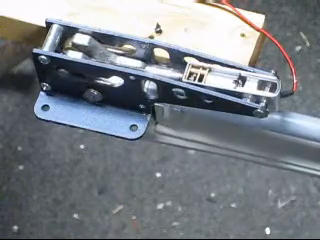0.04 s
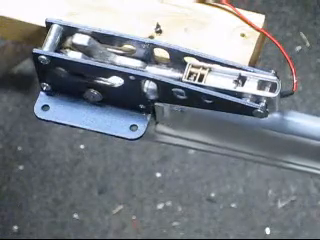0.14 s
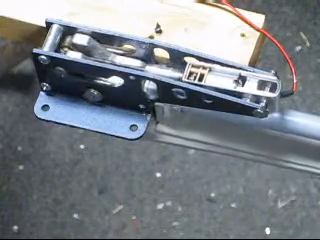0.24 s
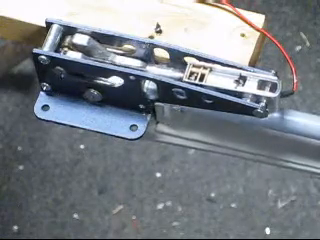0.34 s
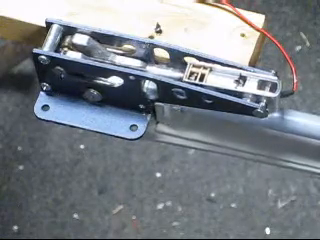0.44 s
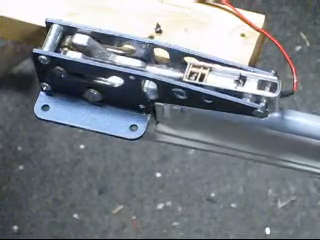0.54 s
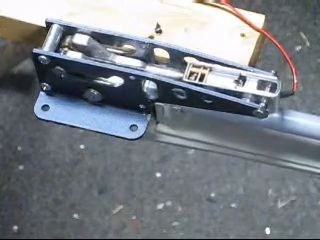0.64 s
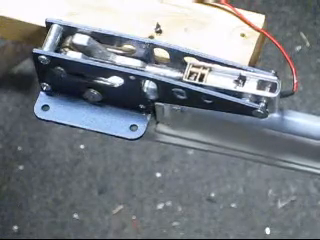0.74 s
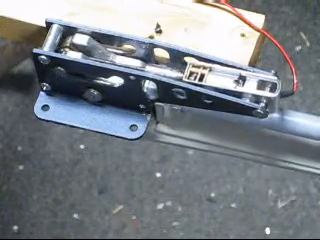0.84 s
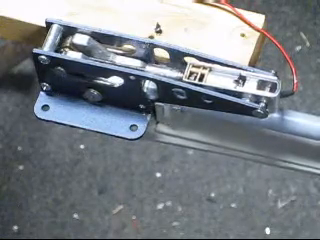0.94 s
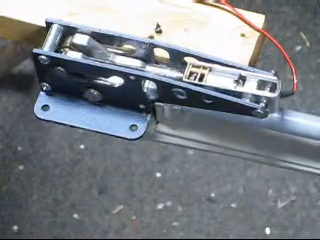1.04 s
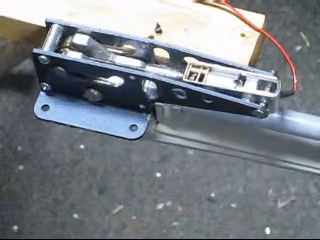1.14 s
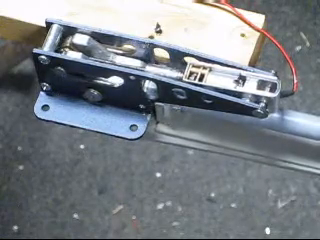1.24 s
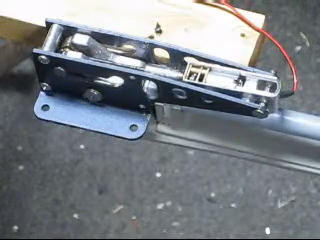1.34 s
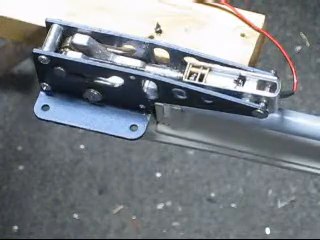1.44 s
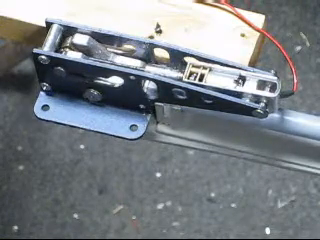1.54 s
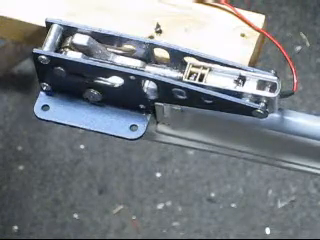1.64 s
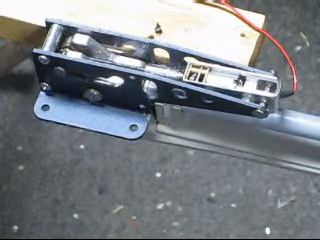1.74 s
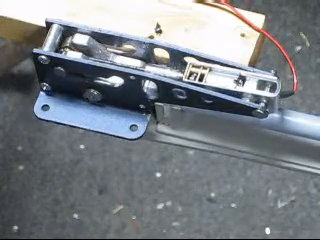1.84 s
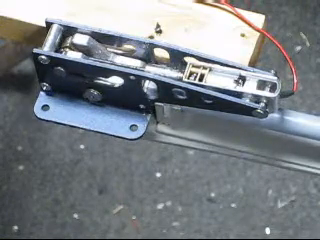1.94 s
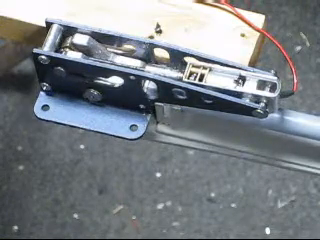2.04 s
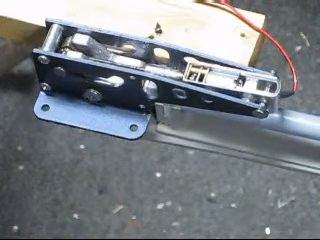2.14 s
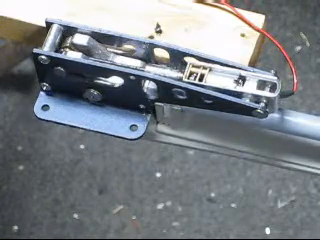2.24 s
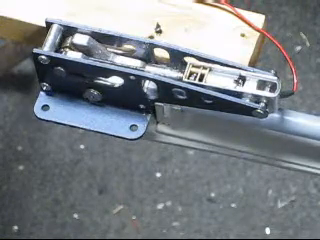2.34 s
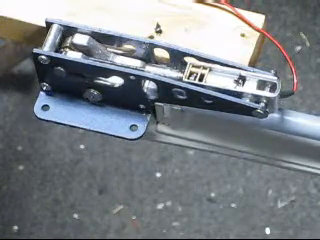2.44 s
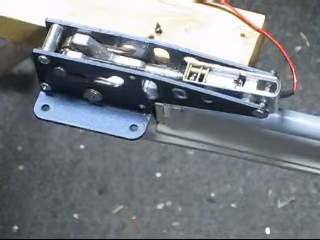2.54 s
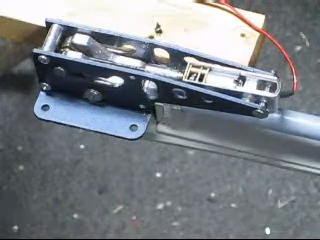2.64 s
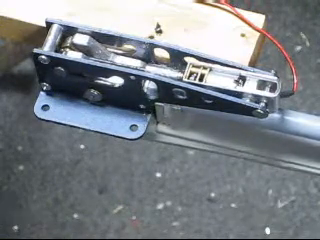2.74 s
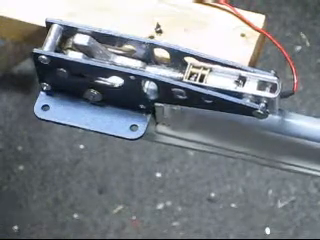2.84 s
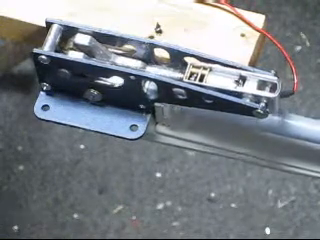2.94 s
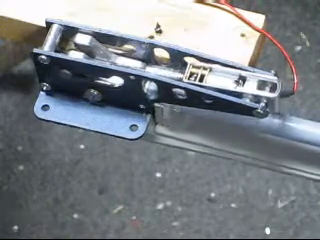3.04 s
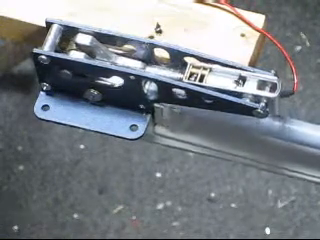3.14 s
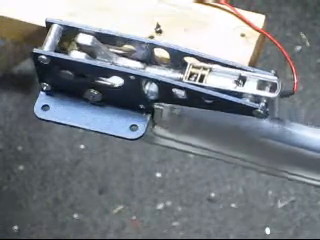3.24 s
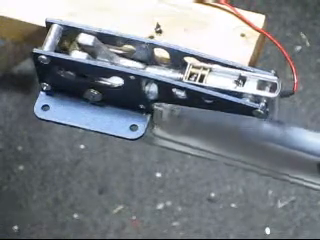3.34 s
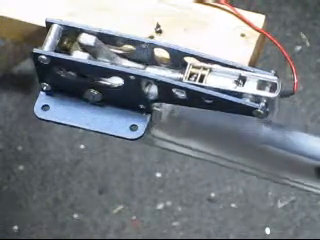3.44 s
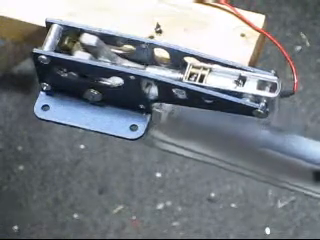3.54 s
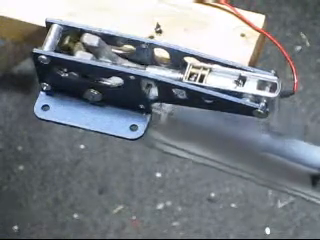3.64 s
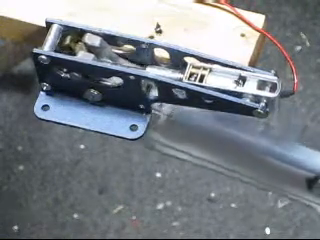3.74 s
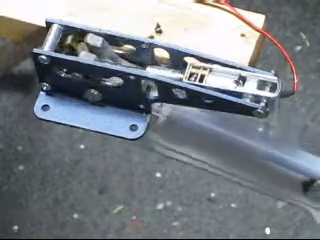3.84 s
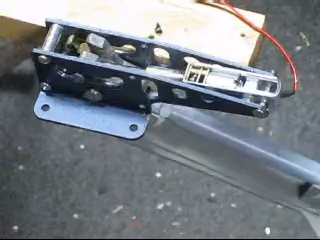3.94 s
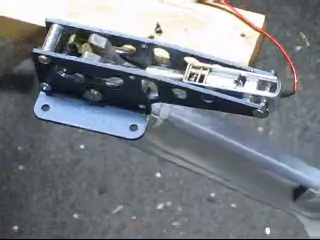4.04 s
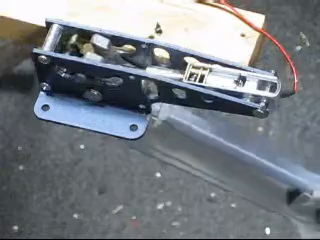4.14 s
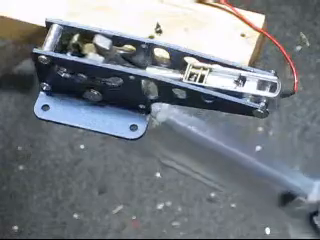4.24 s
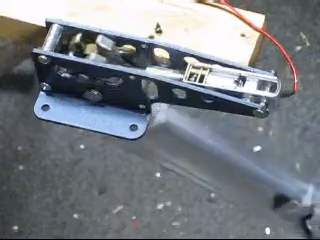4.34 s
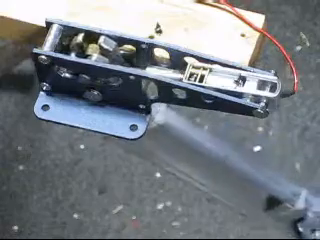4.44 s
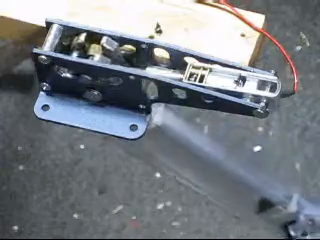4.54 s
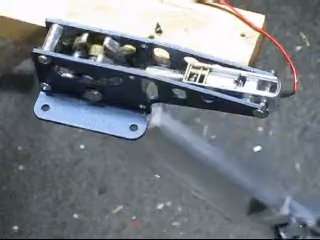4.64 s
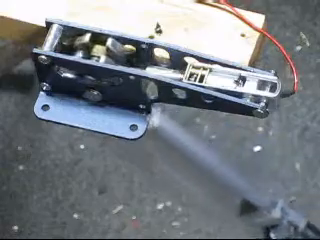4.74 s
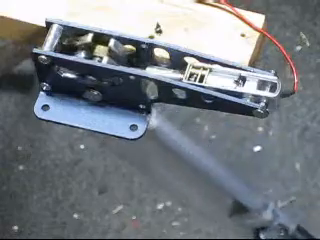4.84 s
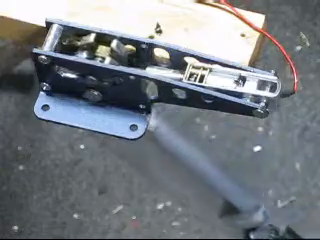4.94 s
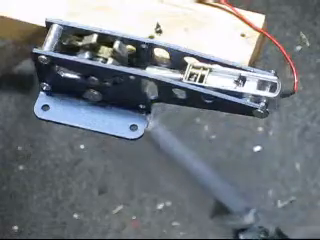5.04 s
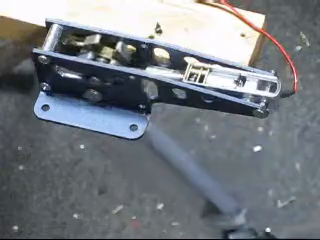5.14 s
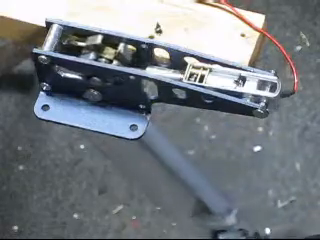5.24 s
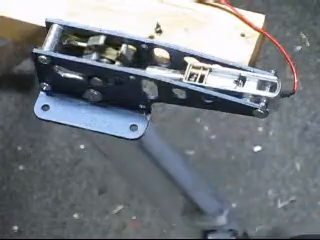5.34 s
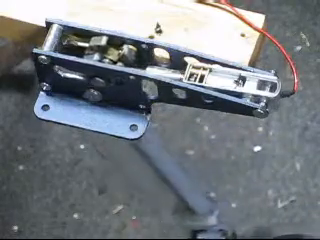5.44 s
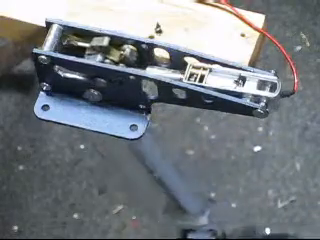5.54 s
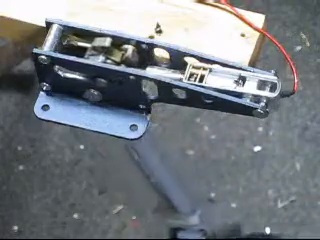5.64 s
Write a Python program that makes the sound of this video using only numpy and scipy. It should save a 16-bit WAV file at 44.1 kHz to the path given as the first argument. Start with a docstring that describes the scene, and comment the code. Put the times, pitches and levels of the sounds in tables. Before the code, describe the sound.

Harsh, buzzy motor whine with gritty gear rattle, two knocks at the stop, a quiet pause, a bright clack and a second running stretch.

```python
"""Geared screw actuator in a quiet workshop

A geared screw actuator in a steel frame runs one way, twitches, rests, then clacks and runs back.
Two small rotors sing at multiples of their shaft speed; off-centre gears make the mesh whine throb.
Filtered noise and random taps are the teeth and screw rattling in the ringing frame.
Short tones glide, damped tones knock, and steady noise and mains hum fill the background."""
import sys
import numpy as np
from scipy import signal
from scipy.fft import rfft, irfft, next_fast_len
from scipy.io import wavfile

SR = 44100
rng = np.random.default_rng(int(sys.argv[2]) if len(sys.argv) > 2 else 0)


def dump_mix(stems):
    """Bounce the given channels to the path in sys.argv[1] as a 16-bit WAV at rate SR."""
    frames = np.atleast_2d(stems).T  # one column per channel
    limited = np.clip(frames, -1, 1)  # hard clip at full scale
    pcm = np.round(limited * 32767).astype(np.int16)
    wavfile.write(sys.argv[1], SR, pcm)


N = 250437
T = np.arange(N) / SR  # time of each sample, s
FREQS = np.fft.rfftfreq(N, 1 / SR)  # Hz

# main rotor in each stroke, before throb and flutter: time_s, shaft_speed_hz, mesh_whine_db, other_tones_db
MAIN_OUT = [(0, 98.5, -19.5, -2.5), (.15, 99.96, -21.5, 0.5), (.3, 101.2, -21.5, 2.5), (.42, 99.2, -21, -3),
            (.5, 94.84, -17.5, -9), (.58, 94.54, -16, -4), (.72, 100.7, -21.5, 1), (.8, 101.3, -20, 1),
            (.95, 102.9, -28.5, 3), (1.15, 103.9, -24.5, 3), (1.3, 105.2, -31, 1.5), (1.44, 105, -30, 4.5)]
MAIN_BACK = [(2.9, 113.2, -44, -5.5), (3, 117.1, -35, -0.5), (3.13, 116.6, -28.5, -3),
             (3.18, 115.4, -23.5, 1), (3.5, 114, -26.5, -1), (3.8, 113.1, -23.5, 1),
             (4.08, 111.1, -28.5, -8), (4.5, 109.8, -22.5, 1.5), (4.9, 109.5, -23.5, 3.5),
             (5.3, 110.2, -24.5, 4), (5.45, 111.4, -28, -2), (5.68, 109.3, -31, 0)]
# second rotor on the way back: time_s, shaft_speed_hz, mesh_whine_db, other_tones_db
SECOND_BACK = [(3.86, 109.4, -35, 0), (4.2, 108.6, -38, 5.5), (4.55, 107.8, -43, 5),
               (4.9, 107.1, -35, -0.5), (5.68, 107.4, -45, 4)]
# second rotor on the way out: it stalls once under load, then twitches twice at the end stop
# on_s, off_s, driven_whine_db, braking_whine_db, other_tones_db (levels at top speed)
SECOND_RUNS = [(-.2, .414, -31, -24, 0), (.595, 1.434, -36, -14, -6.5), (1.548, 1.594, -14.5, -34, -22),
               (1.673, 1.715, -33, -38, -28)]
# tones besides the mesh whine: multiple_of_shaft_speed, level_db (other_tones_db is added)
MAIN_OUT_TONES = [(5, -61), (10, -50), (11.14, -45), (13, -45), (15, -44.5), (20, -45), (26, -39.5),
                  (32, -43), (74, -47.5), (100, -48.5), (111, -49)]
MAIN_BACK_TONES = [(5, -47.5), (11.14, -47.5), (15, -49), (18.57, -44), (22.28, -53), (26, -41), (45, -46),
                   (55, -47), (74, -48), (100, -50)]
SECOND_OUT_TONES = [(5, -49), (11.14, -48), (13, -42), (74, -50.5), (100, -45), (111, -62)]
SECOND_BACK_TONES = [(11.14, -49.5), (13, -42.5), (15, -42), (25, -37.5), (27, -45), (30, -48), (31, -53),
                     (74, -61), (111, -52)]
# gear tones that sing while the load is light: time_s, level_db
LIGHT_WHINE = [(2.92, -35.5), (3.2, -31.5), (3.82, -30.5)]
# their mix: multiple_of_shaft_speed, relative_level_db
LIGHT_TONES = [(11.14, -9.5), (15, -7.5), (26, 3), (74, -14), (100, -23)]
# depth of the throb from the off-centre gears: time_s, whine_swing_db, rattle_swing_db
THROB_OUT = [(.1, 4.5, 0.1), (.55, 4.5, 0.1), (.9, -1, 2)]
THROB_BACK = [(3.5, 1.4, .4), (4.05, 3.8, .4), (5, 3.5, 1.5)]
# rattle of teeth and screw, before band trims and throb: time_s, body_db, clatter_db, hiss_db
RATTLE_OUT = [(0, -35, -29.5, -25), (.43, -34, -28, -25), (.52, -39.5, -34.5, -30), (.7, -30.5, -28, -26),
              (1, -38, -25.5, -28), (1.455, -34, -26.5, -27)]
RATTLE_BACK = [(2.87, -40.5, -44, -38), (3.1, -35.5, -34, -32.5), (3.3, -36, -30.5, -29.5),
               (4, -31, -31, -28.5), (4.8, -31.5, -27.5, -27), (5.68, -31, -26.5, -29)]
# colour of the rattle in each direction: pitch_hz, relative_level_db
COLOUR_OUT = [(200, -30), (600, -30), (850, -17.5), (1100, -12.5), (1800, -4.5), (2350, -8), (2700, -3),
              (3300, 4), (4100, -3.5), (4600, 0), (5300, -8.5), (6000, -17), (8500, -21), (12000, -25.5)]
COLOUR_BACK = [(200, -36.5), (500, -25), (850, -13.5), (1200, -11), (1800, -7), (2350, -3), (2750, 4),
               (3400, 4), (3900, -1.5), (4400, 5), (5300, -4), (6800, -11.5), (9000, -13), (12000, -18.5)]
# resonances of the steel frame: pitch_hz, width_hz, lift_db
FRAME = [(1143, 88, 7.5), (1410, 100, 2.5), (2260, 510, 1), (2696, 88, 4.5), (3198, 49, 7), (3310, 72, 0.5),
         (3520, 120, 6), (4710, 330, -8)]
# the loose gear train shakes at each jerk: peak_s, rise_s, body_db, hiss_db
SHAKES = [(1.551, 0.016, -28, -26.5), (1.587, 0.08, -30.5, -29), (1.636, .07, -31.5, -37.5),
          (1.679, .008, -30, -37), (1.73, 0.096, -32, -34.5), (1.768, 0.1, -31.5, -33.5),
          (2.794, 0.0054, -27.5, -28), (2.835, 0.038, -27.5, -27.5), (2.912, .03, -34, -35)]
# gear whine of the second rotor as it speeds up or brakes:
# start_s, length_s, start_pitch_hz, end_pitch_hz, level_db
WHINE_GLIDES = [(0.616, 0.039, 853, 1277, -31), (.683, 0.015, 1167, 850, -35),
                (0.734, 0.029, 779, 1320, -27.5), (1.629, 0.02, 1280, 930, -28.5),
                (1.757, 0.0174, 1650, 1164, -24)]
# knocks at starts and stops, and one faint dull tick during the rest:
# start_s, level_db, brightness_db_per_octave
KNOCKS = [(1.548, -15.5, -2.5), (1.673, -16.5, -0.5), (1.764, -29, -3), (2.292, -40.5, -12.5),
          (2.791, -11, 10.5), (2.7922, -9, 6), (2.7951, -19.5, -6.5)]
# what a knock rings: pitch_hz, relative_level_db, time_to_fade_60_db_s
KNOCK_MODES = [(710, -29.5, 0.021), (1177, -12.5, 0.032), (1500, -7, 0.031), (1926, -3.5, 0.0077),
               (2600, -4, 0.021), (3280, -8, 0.01), (4660, -12, 0.0089), (6300, -7, .007),
               (7500, -13, 0.013), (10300, -21, 0.0036)]
# colour of the room air: pitch_hz, relative_level_db
AIR_COLOUR = [(25, -20), (80, -14), (250, -10.5), (400, -10), (800, -10.5), (1400, -8.5), (3000, -15.5),
              (7000, -22.5), (12500, -28.5)]
# mains hum: pitch_hz, level_db
HUM = [(60, -79), (120, -61), (180, -64.5), (240, -55.5), (360, -63)]

MESH_ORDER = 37  # mesh whine cycles per shaft turn
WHEEL_RATIO, IDLER_RATIO = 10.2, 4.8  # shaft turns per gear turn
TOP_SPEED_HZ, SPIN_UP_S, BRAKE_HZ_PER_S = 104.4, 0.025, 1150  # second rotor on the way out
SPEED_LAW_DB = 15  # louder by this much for each doubling of speed
START_DB_PER_S, STOP_DB_PER_S = 900, 397  # how fast the gear noise builds and dies away


def amp(db):
    """Turns decibels into gain."""
    return 10 ** (np.asarray(db) / 20)


def unit(x):
    """Scales a signal to an rms of 1."""
    return x / np.sqrt(np.mean(x ** 2) + 1e-20)


def follow(rows):
    """Reads each column of a timed table as a smooth curve over every sample."""
    s, *columns = np.transpose(rows)
    return [np.interp(T, s, column) for column in columns]


def colour(points):
    """Gain at every frequency, drawn through pitch and level points."""
    hz, db = np.transpose(points)
    return amp(np.interp(np.log(FREQS + 1), np.log(hz), db))


def drift(rate_hz):
    """Random wandering of rms 1, made of noise that falls away above rate_hz."""
    size = next_fast_len(N, True)
    smoothing = 1 + (np.fft.rfftfreq(size, 1 / SR) / rate_hz) ** 4
    wander = irfft(rfft(rng.standard_normal(size)) / smoothing, size)
    return unit(wander[:N])


def background():
    """Steady room air is coloured noise; mains hum is a few fixed tones."""
    noise = irfft(rfft(rng.standard_normal(N)) * colour(AIR_COLOUR), N)
    out = amp(-46) * unit(noise)
    for hz, db in HUM:
        out += np.sqrt(2) * amp(db) * np.sin(2 * np.pi * (hz * T + rng.random()))
    return out


def workshop(x, wet_db=-17, t60_s=0.1):
    """The bench and walls return a short tail of scattered, dulled echoes."""
    t = np.arange(SR // 2) / SR
    echoes = rng.standard_normal(len(t)) * (rng.random(len(t)) < 2000 / SR)  # about 2000 a second
    echoes *= (t > 0.002) * amp(-60 * t / t60_s)
    tail = signal.lfilter(*signal.butter(1, 4000, fs=SR), echoes)
    return x + amp(wet_db) * signal.fftconvolve(x, tail / np.linalg.norm(tail))[:N]


def knocks(crack_db=-7, crack_s=0.0016):
    """Each knock is a short noise crack plus the damped ringing of the gearbox."""
    t = np.arange(4096) / SR
    out = np.zeros(N)
    for s, db, bright in KNOCKS:
        crack = amp(crack_db) * rng.standard_normal(len(t)) * np.exp(-t / crack_s)
        ring = np.zeros(len(t))
        for hz, mode_db, t60_s in KNOCK_MODES:
            level_db = mode_db + bright * np.log2(hz / 3000) - 60 * t / t60_s
            ring += amp(level_db) * np.sin(2 * np.pi * (hz * t + rng.random()))
        out[round(s * SR):][:len(t)] += amp(db) * (ring + crack)
    # small parts radiate no bass
    return signal.sosfilt(signal.butter(2, 350, "high", fs=SR, output="sos"), out)


def whine_glides(rough=0.4):
    """Short rough glides of the second rotor's gear whine as it speeds up or brakes."""
    out = np.zeros(N)
    for s, length, from_hz, to_hz, db in WHINE_GLIDES:
        progress = np.clip((T - s) / length, 0, 1)
        pitch_hz = from_hz + (to_hz - from_hz) * progress
        voice = np.sin(2 * np.pi * np.cumsum(pitch_hz) / SR)
        out += amp(db) * np.sin(np.pi * progress) * voice * (1 + rough * drift(160))
    return out


def rattle(levels, spectrum, turns, swing_db, band_db, pulsing, taps_per_s, tap_spread_db, tap_db,
           flicker_db, swing_share):
    """Sliding teeth hiss and loose teeth tap, pulsing with the shaft, into the frame's resonances."""
    tap_sizes = amp(tap_spread_db * np.minimum(rng.exponential(1, N), 3))
    taps = (rng.random(N) < taps_per_s / SR) * rng.choice([-1, 1], N) * tap_sizes
    drive = rng.standard_normal(N) + amp(tap_db) * unit(taps)
    drive *= 1 + pulsing * np.cos(4 * np.pi * turns)  # twice a turn
    drive *= amp(flicker_db * drift(38))
    frame = np.prod([1 + (amp(db) - 1) / (1 + 2j * (FREQS - hz) / width) for hz, width, db in FRAME], axis=0)
    rung = rfft(drive) * colour(spectrum) * frame
    # split into body, clatter and hiss
    below_clatter = 1 / (1 + (FREQS / 2300) ** 16)
    below_hiss = 1 / (1 + (FREQS / 4400) ** 16)
    bands = below_clatter, below_hiss - below_clatter, 1 - below_hiss
    out = np.zeros(N)
    # the rattle throbs with the wheel, each band by its own share
    for band, level, trim_db, share in zip(bands, levels, band_db, swing_share):
        out += unit(irfft(rung * band, N)) * amp(level + trim_db + share * swing_db)
    return out


def shakes():
    """Each jerk swells into a burst of rattle that dies away like the end of a stroke."""
    bursts = []
    for s, rise, body, hiss in SHAKES:
        drop_db = np.clip(np.maximum(20 * (s - T) / rise, STOP_DB_PER_S * (T - s)), 0, 100)
        bursts.append(np.array([[body], [hiss]]) - drop_db)
    body_db, hiss_db = np.max(bursts, axis=0)  # the loudest burst wins
    levels = body_db, (body_db + hiss_db) / 2, hiss_db
    return rattle(levels, COLOUR_BACK, 0, 0, band_db=(0, -1, 0), pulsing=0, taps_per_s=600,
                  tap_spread_db=0.0, tap_db=-6.0, flicker_db=0.4, swing_share=(0, 0, 0))


def fade_db(rows):
    """The quick build before a table's curve begins and the dying away after it ends."""
    before = START_DB_PER_S * (rows[0][0] - T)
    after = STOP_DB_PER_S * (T - rows[-1][0])
    return -np.clip(np.maximum(before, after), 0, 120)


def long_run(rows):
    """Shaft speed, whine level and level of the other tones through one stroke."""
    speed, mesh_db, tones_db = follow(rows)
    return speed, mesh_db + fade_db(rows), tones_db + fade_db(rows)


def short_runs(rows, switch_s=0.0026, brake_fade_db_per_s=200):
    """A rotor spins up towards its top speed, brakes evenly, and is louder the faster it turns."""
    motion = np.zeros((3, N))
    for on, off, driven_db, braking_db, tones_db in rows:
        driven = TOP_SPEED_HZ * (1 - np.exp(-np.clip(T - on, 0, off - on) / SPIN_UP_S))
        speed = np.maximum(driven - BRAKE_HZ_PER_S * np.maximum(T - off, 0), 1)
        loud_db = SPEED_LAW_DB * np.log2(speed / TOP_SPEED_HZ)
        loud_db -= brake_fade_db_per_s * np.clip(T - off, 0, 0.5)
        mesh_db = np.interp(T, [off - switch_s, off + switch_s], [driven_db, braking_db])
        # each run takes over from the one before
        motion = np.where(T >= on, [speed, mesh_db + loud_db, tones_db + loud_db], motion)
    return motion


def shaft_turns(speed):
    """Adds up the turns made at this speed."""
    return np.cumsum(speed) / SR


def gear_swing(turns, ratio, tight_s, lead=0, pinch=0):
    """An off-centre gear binds once a turn, one tight spot falling at tight_s; pinch reshapes the swing."""
    angle = 2 * np.pi * ((turns - np.interp(tight_s, T, turns)) / ratio + lead)
    return np.cos(angle) - pinch * np.cos(2 * angle)


def rotor(motion, tones, swing_db, bend_hz, jitter, rough, flutter_db, pole_depth, strain_db):
    """Mesh whine and other tones ride on the turns of one slightly unsteady shaft."""
    speed, mesh_db, tones_db = motion
    turns = shaft_turns(speed) + jitter * drift(14) + jitter * drift(99) / 5
    # the two magnet poles pulse the tooth load twice a turn
    poles = 1 + pole_depth * np.cos(4 * np.pi * turns)
    bend_turns = np.cumsum(bend_hz * np.ones(N)) / SR
    mesh = np.cos(2 * np.pi * (MESH_ORDER * turns + bend_turns))
    out = amp(mesh_db + swing_db + flutter_db * drift(51)) * poles * mesh
    # hard braking or speeding up changes the level of the tones above the mesh whine
    strain = np.minimum(abs(np.gradient(speed)) * SR / 500, 1)  # full at 500 Hz per second
    scatter = drift(42) + 1j * drift(22.4)
    for order, db in tones:
        # a random starting phase, roughened by a shifted copy of the same wandering
        voice = np.exp(2j * np.pi * rng.random()) + rough * np.roll(scatter, rng.integers(N))
        level_db = db + tones_db + strain_db * strain * (order > MESH_ORDER)
        out += amp(level_db) * (voice * np.exp(2j * np.pi * order * turns)).real
    return np.sqrt(2) * out


def light_whine(turns, flutter_db=3, jitter=0.0022):
    """Gear tones that flutter early in the return stroke, until the load comes on."""
    level_db = follow(LIGHT_WHINE)[0] + fade_db(LIGHT_WHINE)
    flutter = flutter_db * drift(45)
    unsteady = turns + jitter * drift(20)
    out = np.zeros(N)
    for order, db in LIGHT_TONES:
        gain = amp(level_db + db + np.roll(flutter, rng.integers(N)))
        out += gain * np.sin(2 * np.pi * order * unsteady)
    return out


def stroke_back(wheel_tight_s=4.45, uneven=0.42):
    """The return stroke starts fast and sags as the load comes on."""
    motion = long_run(MAIN_BACK)
    turns = shaft_turns(motion[0])
    whine_db, rattle_db = follow(THROB_BACK)
    # no two turns of the wheel bind equally hard
    swing_db = whine_db * (gear_swing(turns, WHEEL_RATIO, wheel_tight_s, pinch=0.25) + uneven * drift(17))
    # the teeth rub just before they sing
    rub_db = rattle_db * gear_swing(turns, WHEEL_RATIO, wheel_tight_s, lead=0.23)
    bend_hz = -4.5 * whine_db * gear_swing(turns, WHEEL_RATIO, wheel_tight_s, lead=-0.22)
    main = rotor(motion, MAIN_BACK_TONES, swing_db, bend_hz, jitter=0.003, rough=0.41,
                 flutter_db=2.3, pole_depth=0.26, strain_db=0)
    second = rotor(long_run(SECOND_BACK), SECOND_BACK_TONES, 0, 0, jitter=0.0019, rough=0.28,
                   flutter_db=4, pole_depth=0.25, strain_db=0)
    levels = follow(RATTLE_BACK) + fade_db(RATTLE_BACK)
    teeth = rattle(levels, COLOUR_BACK, turns, rub_db, band_db=(-1.2, 1.2, 0.3), pulsing=0.077,
                   taps_per_s=1600, tap_spread_db=2.5, tap_db=-3.0, flicker_db=0.68,
                   swing_share=(0.3, 1.7, 0.6))
    return main + second + teeth + light_whine(turns)


def stroke_out(wheel_tight_s=1.082, idler_tight_s=0.39, wheel_whine_db=0.8):
    """The loaded stroke: the idler makes the whine flutter, the slower wheel makes the rattle throb."""
    motion = long_run(MAIN_OUT)
    turns = shaft_turns(motion[0])
    whine_db, rattle_db = follow(THROB_OUT)
    wheel = gear_swing(turns, WHEEL_RATIO, wheel_tight_s)
    idler = gear_swing(turns, IDLER_RATIO, idler_tight_s, pinch=0.37)
    swing_db = whine_db * idler + wheel_whine_db * wheel
    # tight spots drag the pitch down
    bend_hz = -8 * whine_db * gear_swing(turns, IDLER_RATIO, idler_tight_s, lead=-0.25)
    main = rotor(motion, MAIN_OUT_TONES, swing_db, bend_hz, jitter=0.005, rough=0.38,
                 flutter_db=2.26, pole_depth=0.1, strain_db=-7)
    second = rotor(short_runs(SECOND_RUNS), SECOND_OUT_TONES, 0, 0, jitter=0.0022, rough=0.37,
                   flutter_db=0.0, pole_depth=0.18, strain_db=23.5)
    levels = follow(RATTLE_OUT) + fade_db(RATTLE_OUT)
    teeth = rattle(levels, COLOUR_OUT, turns, rattle_db * wheel, band_db=(-1.5, 2.5, -0.3), pulsing=0.06,
                   taps_per_s=810, tap_spread_db=-1.5, tap_db=-2.5, flicker_db=1.3,
                   swing_share=(0.3, -0.4, 1.3))
    return main + second + teeth


def scene():
    """Both strokes with their shakes, whine glides and knocks in the room, over the background."""
    machine = stroke_out() + stroke_back() + shakes() + whine_glides() + knocks()
    return (workshop(machine) + background())[None]


def record(dry):
    """The recorder passes only what lies below its upper band limit."""
    low_pass = signal.firwin(401, 12500, window=("kaiser", 9), fs=SR)  # edge at 12500 Hz
    return signal.oaconvolve(dry, low_pass[None], "same")


dry = scene()
out = record(dry)
dump_mix(out)
```